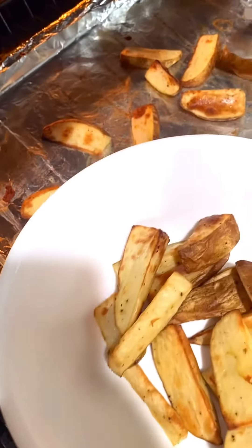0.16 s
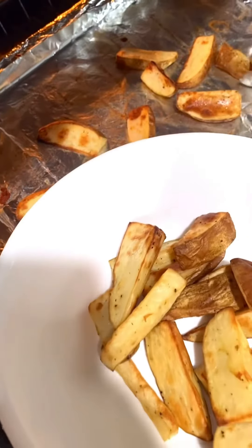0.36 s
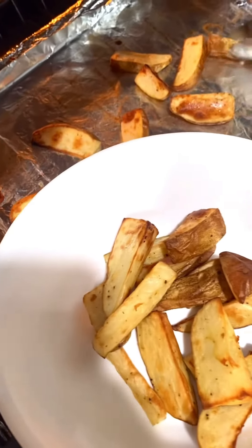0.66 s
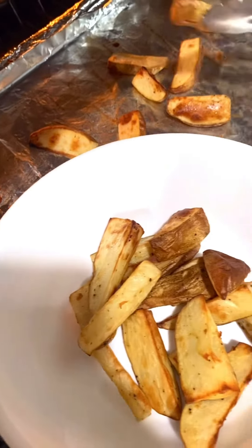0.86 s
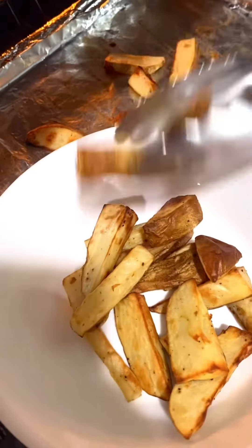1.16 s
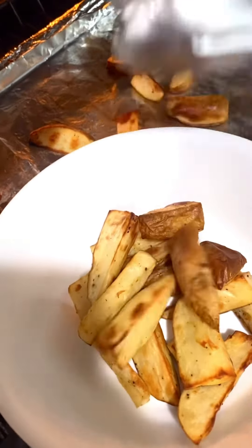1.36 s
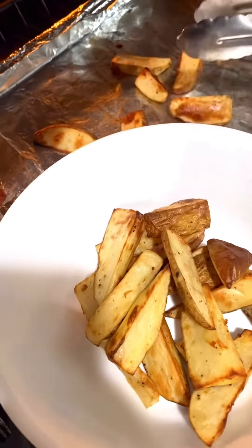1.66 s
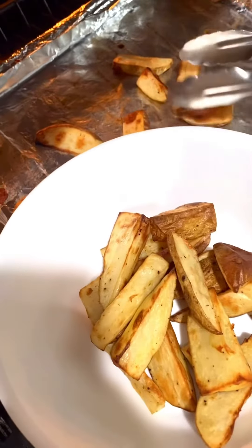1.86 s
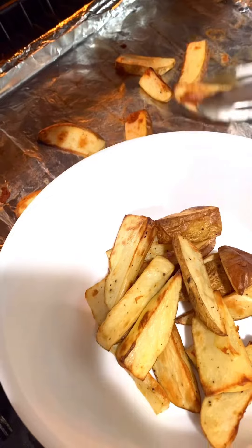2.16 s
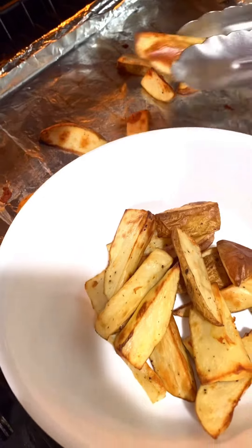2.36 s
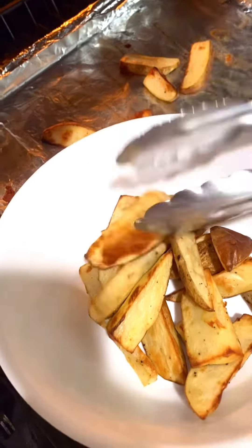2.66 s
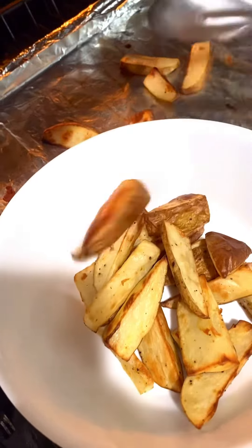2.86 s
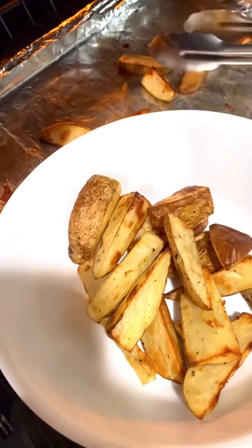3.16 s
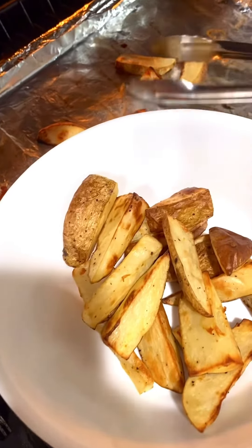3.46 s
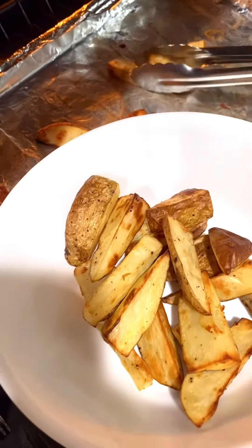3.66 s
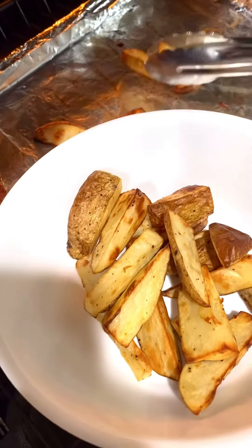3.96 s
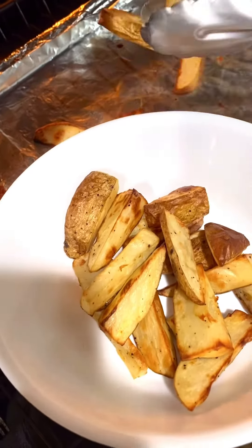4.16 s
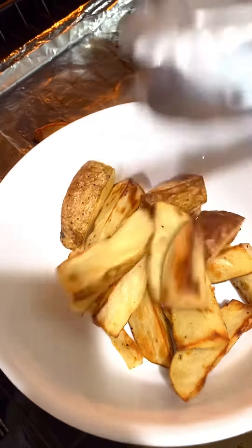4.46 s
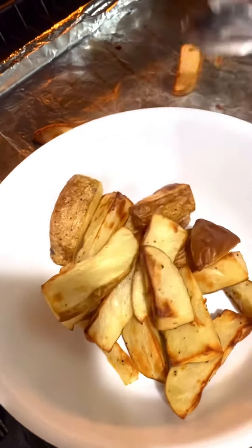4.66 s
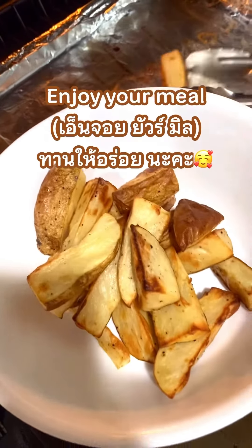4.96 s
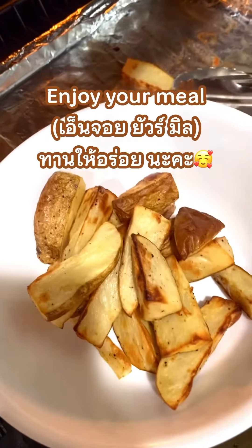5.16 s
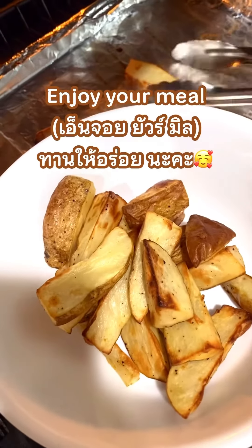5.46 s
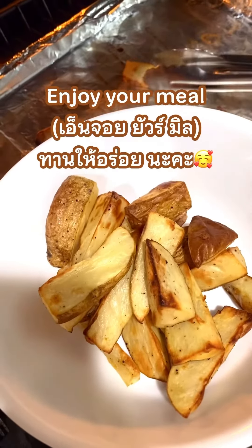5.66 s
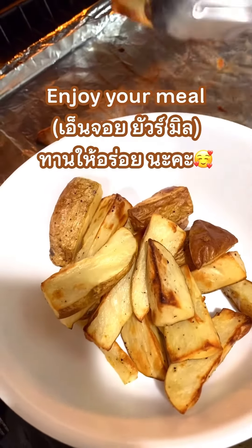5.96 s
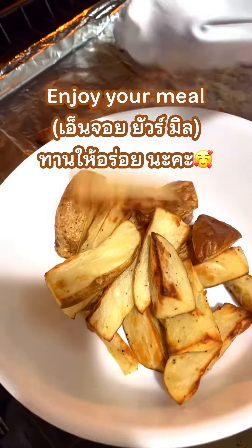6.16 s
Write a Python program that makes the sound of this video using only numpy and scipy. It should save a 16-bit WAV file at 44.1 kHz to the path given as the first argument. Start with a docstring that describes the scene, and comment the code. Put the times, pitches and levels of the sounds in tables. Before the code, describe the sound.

Steel tongs pick up food from a foil-covered tray with rattling knocks, small ticks and crinkly scrapes over a low fan hum.

```python
"""A fan hums and hisses throughout; over it steel tongs pick potato wedges off a foil-lined tray in a kitchen.
Tips knock and drag on the tray, the arms tick, food and hand bump dully: bursts of noise grains
excite decaying modes of tray and tongs and the broad colour of the foil, which then settles.
The bumps are low decaying sines, the fan is shaped noise with blurred tones and two motor lines.
Short diffuse echoes follow; two microphone ports hear it all with a phase offset."""
import sys
import numpy as np
from scipy import signal
from scipy.fft import rfft, irfft, next_fast_len
from scipy.io import wavfile

SR = 44100
rng = np.random.default_rng(int(sys.argv[2]) if len(sys.argv) > 2 else 0)


def to_wav(s):
    """Save 16-bit WAV."""
    ch = np.atleast_2d(s).T  # columns
    pcm = np.round(np.clip(ch, -1, 1) * 32767)  # PCM
    wavfile.write(sys.argv[1], SR, pcm.astype(np.int16))


N = 277389  # length [samples]


def amp(db):
    """Gain of a level in dB."""
    return 10 ** (np.asarray(db) / 20)


def rms_one(x):
    """Scale to unit rms."""
    return x / np.sqrt(np.mean(x ** 2) + 1e-20)


def at_hz(points, hz):
    """Read a table on a log-frequency axis."""
    p = np.array(points, float)
    return np.interp(np.log(hz + 1), np.log(p[:, 0] + 1), p[:, 1])


def filtered(x, response):
    """Multiply the spectrum by response(Hz)."""
    size = next_fast_len(N + SR // 4)
    hz = np.arange(size // 2 + 1) * SR / size
    return irfft(rfft(x, size) * response(hz), size)[..., :N]


def filter_sos(order, cutoff_hz, kind):
    """Butterworth filter sections."""
    return signal.butter(order, cutoff_hz, kind, fs=SR, output="sos")


def drift(rate, shape=()):
    """Slow random wander of unit rms: noise through a double one-pole lowpass at rate Hz."""
    r = np.exp(-2 * np.pi * rate / SR)
    noise = rng.standard_normal(shape + (N + SR // 2,))
    slow = signal.lfilter([1], [1, -2 * r, r * r], noise)
    return rms_one(slow[..., SR // 2:])  # skip the filter's start


def grains(count, spread_db):
    """Dense tiny impacts of uneven size, rms 1."""
    size = amp(spread_db * np.minimum(rng.exponential(1, count), 4))
    return rms_one(rng.standard_normal(count) * size)


def chatter(t60, rise_s, count=SR // 4):
    """A contact is a burst of clumped grains that swells quickly and dies; its outline sets its energy."""
    t = np.arange(count) / SR
    clump_gain = amp(2.6 * rng.standard_normal(count // 100 + 1))
    clumps = np.repeat(clump_gain, 100)[:count]
    decay = amp(-60 * (t / max(t60, .003)) ** 0.91)
    swell = (1 - np.exp(-t / max(rise_s, 1e-4))) ** 1.33
    outline = decay * swell
    burst = grains(count, spread_db=0.0) * clumps * outline
    return rms_one(burst) * np.sqrt(np.mean(outline ** 2))


def ringing(modes, spread_db, favoured_hz=1000, favour_db=0, damped_s=9, reach=0.2, count=SR // 8):
    """Mode rings of a body, one per row, unit energy in all; the point struck favours modes near one pitch."""
    hz, db, t60 = np.array(modes, float).T[:, :, None]
    t = np.arange(count) / SR
    near_favoured = np.exp(-(np.log(hz / favoured_hz) / reach) ** 2)
    db = db + spread_db * rng.standard_normal(hz.shape) + favour_db * near_favoured
    hz = hz * (1 + .004 * rng.standard_normal(hz.shape))  # grip and load shift the modes each time
    if favour_db:
        hz[np.argmax(near_favoured)] = favoured_hz  # the nearest mode is drawn to the pitch
    decay_db = -60 * t / np.clip(t60, .005, .15) - 60 * t / damped_s
    ring = amp(db + decay_db) * np.sin(2 * np.pi * hz * t)
    return ring / np.sqrt(np.sum(ring ** 2))


def struck(burst, rings):
    """A burst excites every mode of a body; each mode keeps its share of the burst's energy."""
    sound = signal.fftconvolve(burst[None], rings, axes=1)
    share = np.sum(burst ** 2) * np.sum(rings ** 2, axis=1) / np.sum(sound ** 2, axis=1)
    return np.sqrt(share) @ sound


def brighter(taps):
    """A smaller, harder contact: the same response tilted upward, unit energy."""
    edge = np.diff(taps, n=2, prepend=[0, 0])
    return edge / np.sqrt(np.sum(edge ** 2))


def add(out, s, sound):
    """Mix a sound in at time s."""
    i = round(s * SR)
    out[i:i + len(sound)] += sound[:N - i]


# low tray modes: (frequency [Hz], relative level [dB], t60 [s])
TRAY_BOOM = [(270, -8, 0.05), (313, -5.5, 0.11), (410.7, -1, 0.12), (447, -28, 0.05), (535, -14.5, 0.14),
             (565, -7.5, 0.072), (634.5, 0, 0.058), (739, -1.5, 0.086), (861, -2.5, 0.039),
             (923, -0.5, 0.091), (974, 1.5, 0.06), (1036, -9.5, 0.074)]
# upper tray modes: (frequency [Hz], relative level [dB], t60 [s])
TRAY_CLANG = [(1210, -3, .03), (1475, -3, .075), (1640, 0, .04), (1760, -4, .04), (1955, -1, .05),
              (2120, -2, .035), (2330, -3, .05), (2400, -3, .06), (2500, -4, .05), (2595, -3, .07),
              (2687, -3, .08), (2960, -6, .05)]
# modes of the tongs' arms, damped by the hand: (frequency [Hz], relative level [dB], t60 [s])
TONGS_MODES = [(2050, -10, .06), (2980, -10, .06), (3255, -3, .07), (3420, -5, .07), (3735, -5, .02),
               (4295, 0, .04), (5200, -4, .015), (5740, -1, .045), (6435, -5, .04), (6860, -1, .06),
               (7500, -4, .05), (8655, 1, .035), (9850, -4, .035), (10400, -5, .03)]
# tips strike or shove the tray: (time [s], nominal foil level [dB], boom re foil [dB], clang re foil [dB],
#   sheen re foil [dB], favoured boom [Hz], favoured clang [Hz], rise [s])
TRAY_KNOCKS = [(0.309, -19.5, -1, -5, 8.5, 525, 1700, 0.01), (0.372, -33, -19, 6.5, 14, 380, 2140, 0.0039),
               (0.39, -37.5, 4, 5, 11, 410, 2150, 0.0017), (0.4773, -40, -1, 9, -3, 245, 1514, 0.002),
               (0.559, -42, 7, 3.5, 4, 272, 1480, 0.0029), (0.645, -44, 7, 8, -2, 272, 1520, 0.0011),
               (1.9613, -12.5, 2.5, 0, -32, 325, 1784, 0.0056),
               (2.1482, -50.5, 20, 13.5, -10, 313, 1600, 0.0018),
               (2.241, -61.5, 4, 18, -5, 310, 1390, 0.0027), (2.3227, -50, 16, 14.5, 2, 272, 1470, 0.0028),
               (2.425, -63.5, 28, 15, -2, 297, 1497, 0.003), (2.509, -62, 24, 16, -5, 250, 1500, 0.0028),
               (2.6007, -51, -3, 17, -5, 366, 1650, 0.0056), (2.6797, -52, 15.5, 14, -6, 221, 1540, 0.0016),
               (3.3843, -41, 13.5, 3.5, -15, 408, 1540, 0.00066),
               (3.428, -31, 12.5, -15, -13, 380, 1460, 0.023),
               (3.573, -22.5, 5.5, 6.5, -6, 414, 1146, 0.024),
               (3.589, -22, -1, -3.5, 4.5, 957, 2540, 0.0091), (4.394, -45, 2, -7, 12, 980, 1570, 0.00093),
               (4.75, -22.5, 0, -5.5, 0, 408, 2560, 0.0026), (4.761, -22, 3.5, 2.5, 6, 315, 2708, 0.0018),
               (4.882, -23, 2.5, 2, -10, 560, 1495, 0.0031), (5.437, -13, -3, -14, -3.5, 312, 2424, 0.0019),
               (5.515, -30, 10, 7, 2.5, 600, 1630, 0.016)]
KNOCK_T60_S, T60_PER_RISE = 0.055, 3.5  # a slower shove chatters longer
# a hard knock singles out the modes of the spot struck
HARD_KNOCK_DB, CLANG_FAVOUR_DB = (-40, -25), (7, 11)


def knocks(foil):
    """Each blow rattles the foil and sets tray and tongs ringing."""
    out, sheen = np.zeros(N), brighter(foil)
    for s, db, boom_db, clang_db, sheen_db, boom_hz, clang_hz, rise_s in TRAY_KNOCKS:
        burst = amp(db) * chatter(KNOCK_T60_S + T60_PER_RISE * rise_s, rise_s)
        boom = ringing(TRAY_BOOM, spread_db=2, favoured_hz=boom_hz, favour_db=13, reach=.12)
        clang_favour_db = np.interp(db, HARD_KNOCK_DB, CLANG_FAVOUR_DB)
        clang = ringing(TRAY_CLANG, spread_db=2, favoured_hz=clang_hz, favour_db=clang_favour_db, reach=.08)
        arms = ringing(TONGS_MODES, spread_db=5, damped_s=.06, count=SR // 16)
        add(out, s, amp(boom_db) * struck(burst, boom))
        add(out, s, amp(clang_db) * struck(burst, clang))
        add(out, s, amp(-15) * struck(burst, arms))
        add(out, s, signal.fftconvolve(burst, foil + amp(sheen_db) * sheen))
    return out


# the arms of the tongs tick: (time [s], nominal level [dB], favoured ring [Hz],
#   tray clang re ring [dB], favoured clang [Hz])
ARM_TICKS = [(0.492, -50, 9600, -15, 1500), (1.134, -36.5, 4100, -20, 1610),
             (1.2047, -26.5, 5300, -31, 1690), (1.2134, -28, 2990, 0, 1710), (1.256, -42, 5200, -14, 1610),
             (1.268, -45, 5300, -3, 1610), (1.3082, -40, 2900, -4, 1630), (1.353, -46, 8000, -5, 1620),
             (1.3683, -41.5, 9900, -17, 1610), (1.435, -53, 6800, -20, 1610),
             (1.445, -39.5, 3800, -25, 1610), (2.579, -37.5, 4130, -16, 1610),
             (2.6146, -41.5, 4080, 1, 1610), (2.6384, -41, 2900, -12, 2500), (2.9303, -24, 8730, -2, 2700),
             (2.958, -55, 8900, -15, 2440), (3.021, -36, 9800, -20, 1610), (3.068, -46, 7540, -16, 1610),
             (3.1868, -44, 9550, -6, 1610), (3.215, -40, 8100, -10, 1610), (3.251, -48, 7550, -15, 1610),
             (3.332, -42, 10200, -11, 1610), (3.828, -48, 2930, -11, 2500), (4.2986, -34, 4380, -16, 1610),
             (4.396, -32, 3420, 4.5, 1460), (4.4275, -34.5, 3360, -16, 1610), (4.4702, -51, 2980, 5, 2550),
             (4.655, -41.5, 4100, -12, 1610), (5.0895, -10, 6970, -12, 2090), (5.094, -23, 3360, -14, 2050),
             (5.101, -34, 4200, -16, 2050), (5.1132, -20, 8800, -21, 2050), (5.12, -32, 6850, -22, 2050),
             (5.287, -33, 5860, -9, 1610), (5.385, -33, 6980, -13, 1620), (6.025, -35.5, 5560, -23, 1610),
             (6.1496, -30.5, 3730, -9, 1640), (6.1562, -34.5, 6000, 0, 1610),
             (6.177, -30.5, 10700, -9, 1630)]
TICK_T60_S, GRIP_T60_S = 0.013, 0.06  # the hand damps the arms
FIRST_TOUCH_DB = 10  # the first grain of a tick stands out
CRACK_DB, SNAP_DB = 6.5, -41  # bright and full parts of the crack, before the hardness gain
HARD_TICK_DB = (-32, -20)  # from a light tick to a hard one
TICK_FAVOUR_DB, TICK_CRACK_DB = (17, 3), (-2, -6)  # a hard tick rings the whole arm and cracks less


def ticks(foil):
    """Steel on steel: a crack, the short ring of the arms and a little of the tray."""
    out = np.zeros(N)
    arms_treble = filter_sos(3, 1900, "high")  # the arms' ring and snap keep only their treble, above 1.9 kHz
    crack = amp(CRACK_DB) * brighter(foil) + amp(SNAP_DB) * signal.sosfilt(arms_treble, foil)
    for s, db, ring_hz, clang_db, clang_hz in ARM_TICKS:
        burst = chatter(TICK_T60_S, rise_s=0.00074, count=SR // 30)
        burst[0] = amp(FIRST_TOUCH_DB)
        favour_db = np.interp(db, HARD_TICK_DB, TICK_FAVOUR_DB)
        ring = ringing(TONGS_MODES, spread_db=1.0, favoured_hz=ring_hz, favour_db=favour_db,
                       damped_s=GRIP_T60_S, reach=0.1, count=SR // 16)
        # food on the tray damps its clang
        clang = ringing(TRAY_CLANG, spread_db=3, favoured_hz=clang_hz, favour_db=14,
                        damped_s=0.03, reach=.15, count=SR // 30)
        crack_db = db + np.interp(db, HARD_TICK_DB, TICK_CRACK_DB)
        add(out, s, amp(db) * struck(burst, signal.sosfilt(arms_treble, ring)))
        add(out, s, amp(db + clang_db) * struck(burst, clang))
        add(out, s, amp(crack_db) * signal.fftconvolve(burst, crack))
    return out


def stick_slip():
    """Friction sticks and slips: uneven grains whose level clumps at a slow and a fast pace."""
    return rms_one(grains(N, spread_db=2.5) * amp(1.2 * drift(40) + 2.2 * drift(300)))


def rub(out, s, slips, outline, foil, sheen_db, rings):
    """Shaped slips excite the foil, its sheen and whatever else rings with it."""
    rings[:len(foil)] += foil + amp(sheen_db) * brighter(foil)
    grain = slips[round(s * SR):][:len(outline)]
    add(out, s, signal.fftconvolve(grain * outline[:len(grain)], rings))


# tips and food dragged over the foil: (start [s], length [s], crackle level [dB], tray re crackle [dB],
#   sheen re crackle [dB], favoured boom [Hz], squeak of the arms re crackle [dB], squeak [Hz])
FOIL_DRAGS = [(0.346, 0.039, -45, 7, -16, 415, -8, 3770), (0.409, 0.041, -42, 0, 5.5, 385, -8, 6200),
              (0.462, 0.069, -51, -13, 9.5, 400, -3, 2440), (0.53, 0.1, -61, 9.5, 7, 388, -8, 3800),
              (1.235, 0.031, -65, -3, 11, 640, -7, 5300), (1.337, 0.023, -58, 12.5, 6, 640, -9, 8100),
              (2.08, 0.048, -57.5, 7, -15, 557, -3, 2500), (2.595, 0.093, -62, 10, 3.5, 374, -9, 4080),
              (2.836, 0.062, -59, 7, 6, 402, -13, 5700), (2.911, 0.019, -55.5, -12, 18, 404, -10, 8700),
              (2.95, 0.031, -66, -12, 9, 404, -7, 8900), (3.06, 0.05, -65, -2, 5, 640, -1, 7380),
              (3.118, 0.061, -59, 3, 7, 650, 0, 10000), (3.142, 0.05, -62.5, -3, 8, 640, 8, 9930),
              (3.167, 0.079, -63, 0, 9, 640, 5, 7740), (3.172, 0.055, -68, -6, 5, 640, -2, 5300),
              (3.22, 0.039, -63, 11.5, 8, 666, 5, 7600), (3.3, 0.033, -50, -10, 6, 630, -5, 7330),
              (3.387, 0.075, -44, 5, 2, 420, -5, 5060), (3.488, 0.099, -48, 1.5, 5, 411, -3.5, 3850),
              (3.697, 0.051, -56, -14, 1, 403, -16, 5700), (3.769, 0.042, -59, -10, 7, 403, -16, 7200),
              (4.329, 0.056, -56.5, -20, 6, 645, -5, 4520), (4.434, 0.043, -70, -12, 17, 640, -3, 3300),
              (4.868, 0.2, -45.5, 0.5, 5, 310, -9, 3910), (5.316, 0.1, -56.5, -11, 1, 645, -4, 5740),
              (5.476, 0.044, -39.5, 4, 0, 644, -7, 2950), (6.037, 0.054, -56, 3, 1, 640, -4, 5460)]
DRAG_SWELL_S, DRAG_FADE_DB_PER_S = 0.043, 339


def drags(foil, slips):
    """Stick and slip excite foil and tray and make the arms squeak."""
    out, t = np.zeros(N), np.arange(SR * 2 // 5) / SR
    for s, length, db, tray_db, sheen_db, boom_hz, squeak_db, squeak_hz in FOIL_DRAGS:
        fade_db = DRAG_FADE_DB_PER_S * np.maximum(t - length, 0)
        outline = np.clip(t / DRAG_SWELL_S, 0, 1) * amp(db - fade_db)
        squeak = ringing(TONGS_MODES, spread_db=4, favoured_hz=squeak_hz, favour_db=24,
                         damped_s=.1, reach=.05, count=SR // 16)
        rings = amp(tray_db) * tray(boom_hz)
        rings[:SR // 16] += amp(squeak_db) * squeak.sum(axis=0)
        rub(out, s, slips, outline, foil, sheen_db, rings)
    return out


# (level re the contact [dB], t60 [s])
SETTLE_KNOCK, SETTLE_TICK = (-4.5, 0.15), (-17, 0.072)
SETTLE_TRAY_DB, SETTLE_SHEEN_DB, SETTLE_DELAY_S = -3.5, -11.5, 0.019


def settling(foil, slips):
    """After each contact the foil settles in fading slips; after a knock the tray sounds with it."""
    out, t = np.zeros(N), np.arange(SR * 2 // 5) / SR
    swell = np.clip(t / SETTLE_DELAY_S, 0, 1)
    for s, db, *_, boom_hz, clang_hz, rise_s in TRAY_KNOCKS:
        outline = swell * amp(db + SETTLE_KNOCK[0] - 60 * t / SETTLE_KNOCK[1])
        rings = amp(SETTLE_TRAY_DB) * tray(boom_hz, clang_hz)
        rub(out, s, slips, outline, foil, SETTLE_SHEEN_DB, rings)
    for s, db, *_ in ARM_TICKS:
        outline = swell * amp(db + SETTLE_TICK[0] - 60 * t / SETTLE_TICK[1])
        rub(out, s, slips, outline, foil, SETTLE_SHEEN_DB, np.zeros(len(foil)))
    return out


def tray(boom_hz, clang_hz=1500):
    """Response of the whole tray to a grain at one spot."""
    boom = ringing(TRAY_BOOM, spread_db=2.5, favoured_hz=boom_hz, favour_db=8, count=SR // 10)
    clang = ringing(TRAY_CLANG, spread_db=2.5, favoured_hz=clang_hz, favour_db=6,
                    damped_s=.15, count=SR // 10)
    return boom.sum(axis=0) + amp(-6.0) * clang.sum(axis=0)


# spectrum of the foil's crackle: (frequency [Hz], relative level [dB])
FOIL_SPECTRUM = [(170, -48), (300, -28), (1000, -10.5), (2500, -6.5), (4400, -7), (6400, -13), (9000, -18),
                 (12000, -22.5), (16000, -25)]


def foil_colour():
    """Short causal response with the spectrum of the foil, unit energy."""
    hz = np.linspace(0, SR / 2, 513)
    doubled = amp(2 * at_hz(FOIL_SPECTRUM, hz)) + 1e-6  # minimum_phase halves the dB again
    taps = signal.minimum_phase(signal.firwin2(511, hz, doubled, fs=SR))
    return taps / np.sqrt(np.sum(taps ** 2))


# dull bumps of food and hand: (time [s], level before the swell [dB], pitch [Hz])
SOFT_BUMPS = [(0.461, -17, 90), (0.754, -16, 61), (0.926, -15.5, 61), (1.002, -17, 126), (2.397, -18, 64.6),
              (2.604, -18.5, 132), (5.53, -18, 176), (5.745, -40, 150)]


def bumps():
    """Soft contacts: a few cycles of low ring."""
    out, t = np.zeros(N), np.arange(SR // 8) / SR
    swell = (1 - np.exp(-t / 0.0094)) ** 2
    for s, db, hz in SOFT_BUMPS:
        add(out, s, amp(db - 60 * t / 0.061) * swell * np.sin(2 * np.pi * hz * t))
    return out


ROOM_T60_S, ROOM_DB, ROOM_DULL_HZ = 0.27, -11, 4500


def kitchen(x):
    """Diffuse echoes, different at each port, duller than the direct sound."""
    t = np.arange(SR // 2) / SR
    tail = rng.standard_normal((2, len(t))) * amp(-60 * t / ROOM_T60_S) * np.clip(t / 0.0033, 0, 1)
    # long waves reach both ports alike, so the separate echoes keep only their upper part
    tail = signal.sosfilt(filter_sos(1, 500, "high"), tail)
    tail = signal.sosfilt(filter_sos(1, ROOM_DULL_HZ, "low"), tail)
    return signal.fftconvolve(x[None], tail / np.sqrt(np.sum(tail ** 2) / 2), axes=1)[:, :N]


# likeness of the fan noise at the ports: (frequency [Hz], share of power common to both [0-1])
PORT_LIKENESS = [(60, 0.99), (300, 0.99), (640, 0.66), (1400, 0.9), (3100, 0.98), (7000, 0.32), (15000, 1)]


def port_noise():
    """White noise at two ports, partly shared and partly each port's own."""
    def share(hz):
        return np.clip(at_hz(PORT_LIKENESS, hz), 0, 1)

    common = filtered(rng.standard_normal(N), lambda hz: np.sqrt(share(hz)))
    own = filtered(rng.standard_normal((2, N)), lambda hz: np.sqrt(1 - share(hz)))
    return common + own


# spectrum of the air noise: (frequency [Hz], relative level [dB])
AIR_SPECTRUM = [(15, -19), (25, -21), (49, 0.5), (236, -3.5), (427, -12.5), (660, -14), (820, -17),
                (1050, -17), (1250, -17.5), (1560, -19.5), (2050, -29), (3340, -35), (7000, -40.5),
                (11000, -47), (16000, -49)]
# gain of the hum: (time [s], level [dB])
HUM_LEVEL = [(0, -4.5), (.8, -1), (1.5, -3), (2.3, -1), (3, -2), (3.8, -2.5), (4.5, -4), (5.3, -4),
             (6.29, -4)]
FAN_DB = -42  # rms of the air noise before the hum gain


def fan_air(noise):
    """Coloured air noise: the hum wavers, the hiss is even."""
    air = amp(FAN_DB) * rms_one(filtered(noise, lambda hz: amp(at_hz(AIR_SPECTRUM, hz))))
    hum = filtered(air, lambda hz: 1 / (1 + (hz / 1800) ** 4))
    s, db = np.transpose(HUM_LEVEL)
    hum_db = np.interp(np.arange(N) / SR, s, db) + 1.26 * drift(3.1)
    return air - hum + hum * amp(hum_db)


MOTOR_HZ, MOTOR_WANDER_HZ = 77.5, .25  # mean rate, rms wander
MOTOR_ORDERS, MOTOR_ORDER_DB = (13, 14), (-61, -56.5)  # multiples of the rate, nominal peak levels


def motor():
    """Two thin multiples of the motor's wandering rate stand out, each wavering in level."""
    turn = 2 * np.pi * np.cumsum(MOTOR_HZ + MOTOR_WANDER_HZ * drift(1)) / SR
    out = np.zeros(N)
    for order, line_db in zip(MOTOR_ORDERS, MOTOR_ORDER_DB):
        out += amp(line_db + 2 * drift(1.8)) * np.sin(order * turn)
    return out


# blurred fan tones: (frequency [Hz], full width at half amplitude [Hz], rms level [dB])
FAN_TONES = [(119.8, 27, -57.5), (544.6, 8.2, -71.5), (669, 61, -60), (902, 6, -66.5), (1530, 145, -66.5),
             (2173, 31, -71)]


def fan_tones(noise):
    """Blurred tones: narrow resonances cut from the same noise as the air."""
    out = np.zeros((2, N))
    for tone_hz, width, tone_db in FAN_TONES:
        tone = filtered(noise, lambda hz: 1 / (1 + (2 * (hz - tone_hz) / width) ** 2))
        out += amp(tone_db) * rms_one(tone)
    return out


def fan():
    """Air noise, motor lines and blurred tones; the noise is partly alike at the two ports."""
    noise = port_noise()
    return fan_air(noise) + motor() + fan_tones(noise)


def scene():
    """Tongs and tray close by, their echoes, the bumps and the fan."""
    foil, slips = foil_colour(), stick_slip()
    near = knocks(foil) + ticks(foil) + drags(foil, slips) + settling(foil, slips)
    near = signal.sosfilt(filter_sos(3, 225, "high"), near)  # the near sounds keep no deep bass, below 225 Hz
    return near + amp(ROOM_DB) * kitchen(near) + bumps() + fan()


# phase between the ports: (frequency [Hz], lead of the left port [rad])
PHASE_LEAD = [(0, 0), (300, -.2), (690, -.8), (950, .1), (2150, .4), (3190, 1.8), (3960, .6), (4310, 1.0),
              (4820, 3.2), (5510, 6.5), (6370, 7.1), (7840, 7.7), (10300, 8.1), (12000, 8.4), (16000, 8.4)]
# level between the ports: (frequency [Hz], left over right [dB])
LEVEL_BALANCE = [(60, 0), (130, -1), (290, 1.5), (640, -3.5), (1410, -2), (3100, 0), (6820, 0.0),
                 (15000, 0.5)]
SUM_LOWPASS_HZ, CUTOFF_HZ = 11600, 16500  # lowpass edge of the sum, edge of the final 70 dB stopband


def record(dry):
    """The ports differ in phase and level; the sum is low-passed at 11.6 kHz, the difference at 16.5 kHz."""
    sides = np.array([[.5], [-.5]])  # each port takes half of the difference

    def port_response(hz):
        return amp(sides * at_hz(LEVEL_BALANCE, hz)) * np.exp(1j * sides * at_hz(PHASE_LEAD, hz))

    ports = filtered(dry, port_response)
    common = ports.mean(axis=0)
    dulled = filtered(common, lambda hz: 1 / np.sqrt(1 + (hz / SUM_LOWPASS_HZ) ** 80))
    top_cut = signal.cheby2(12, 70, CUTOFF_HZ, fs=SR, output="sos")
    return signal.sosfilt(top_cut, ports - common + dulled)


dry = scene()
out = record(dry)
to_wav(out)
```